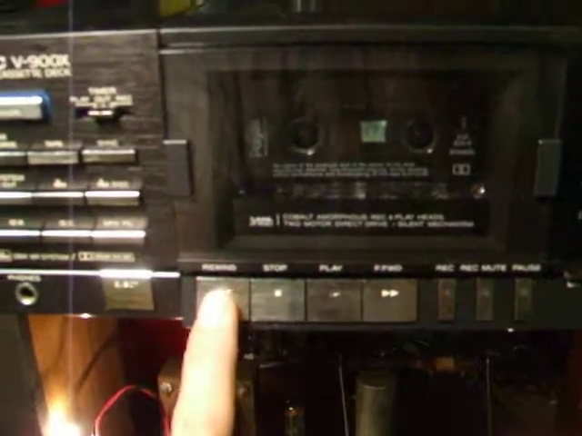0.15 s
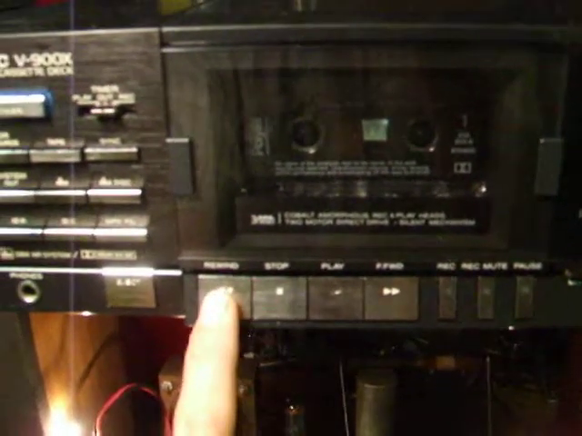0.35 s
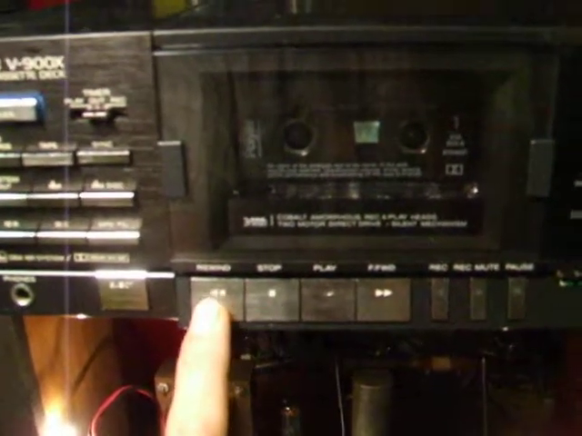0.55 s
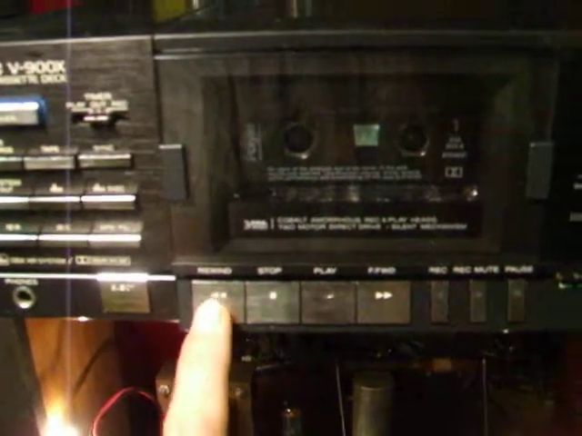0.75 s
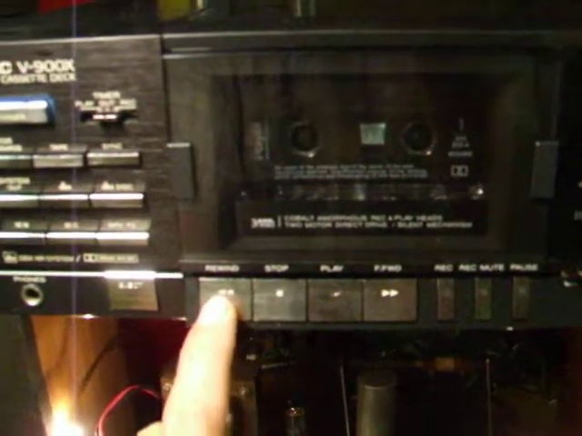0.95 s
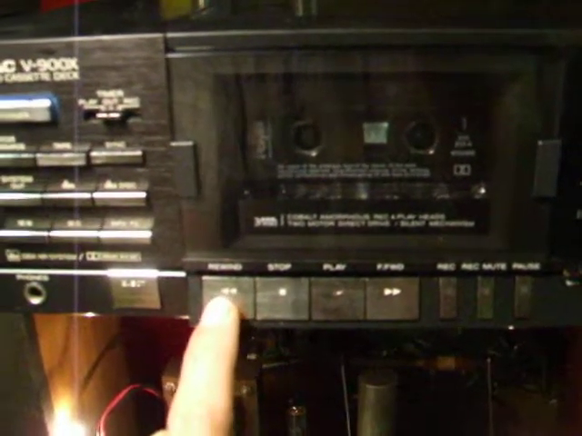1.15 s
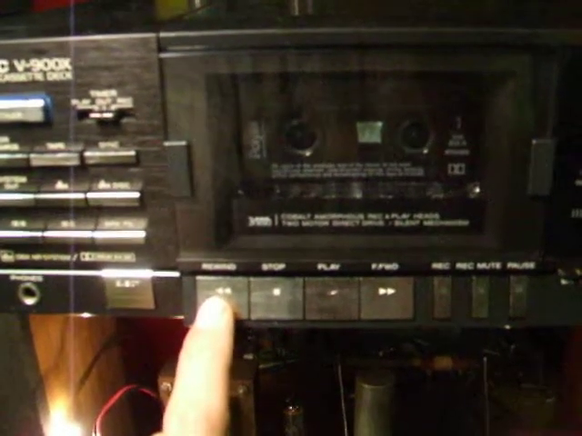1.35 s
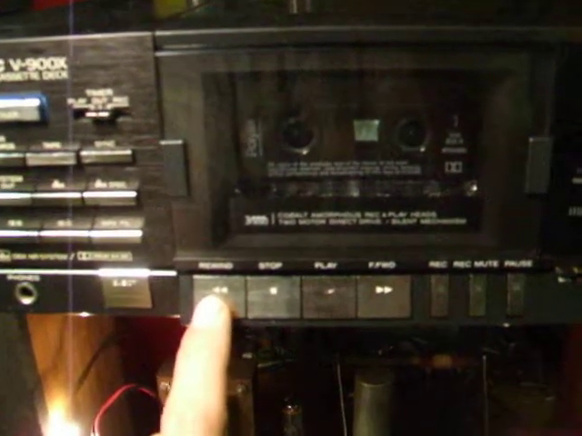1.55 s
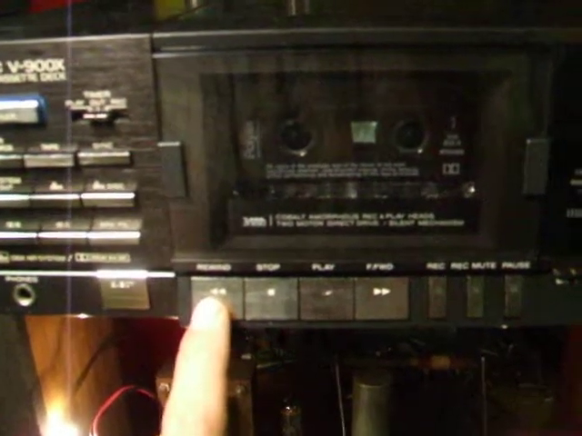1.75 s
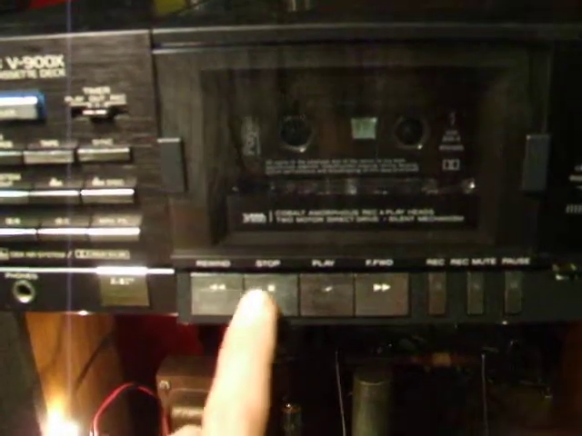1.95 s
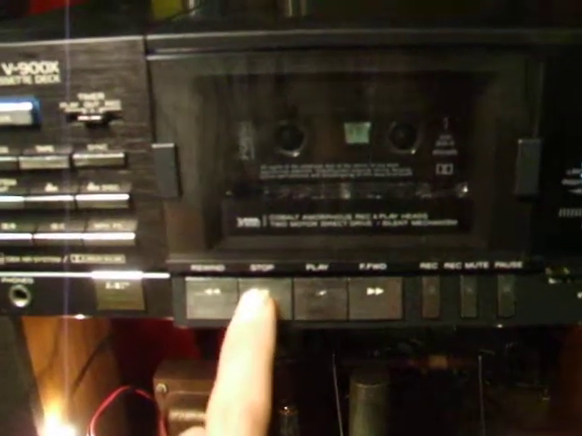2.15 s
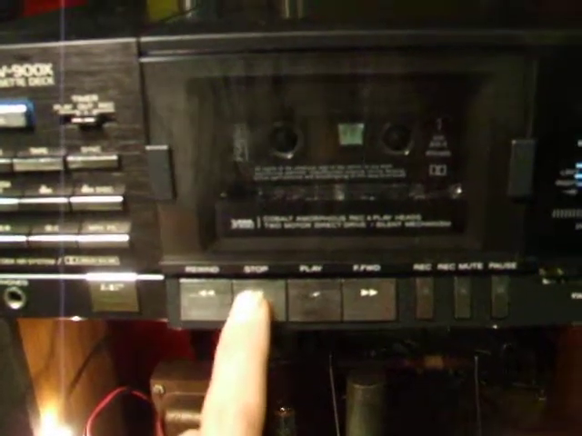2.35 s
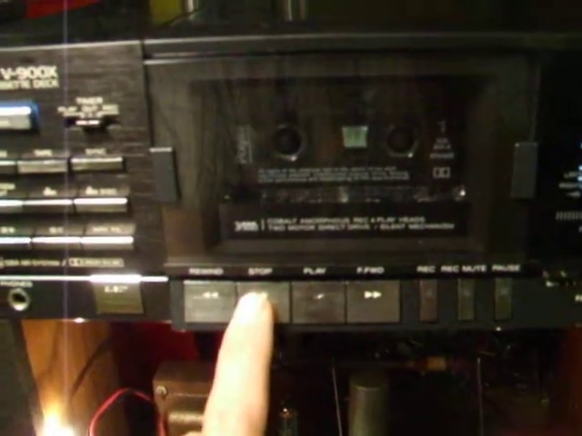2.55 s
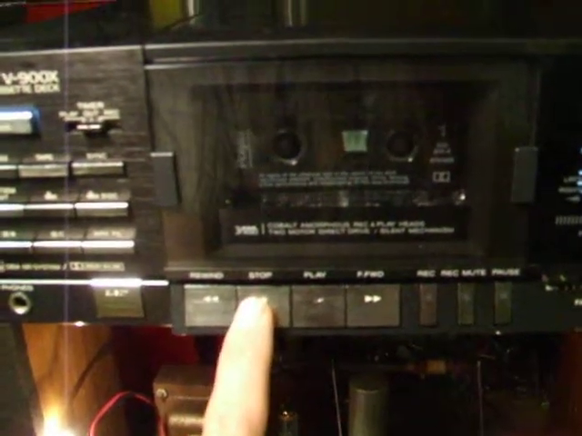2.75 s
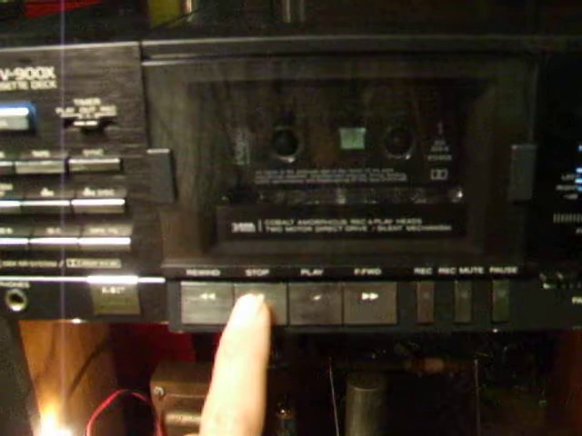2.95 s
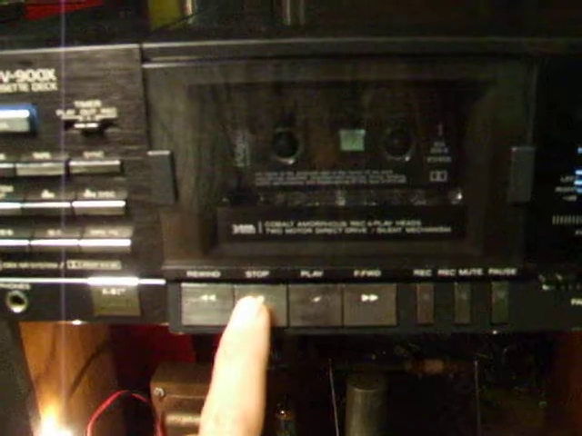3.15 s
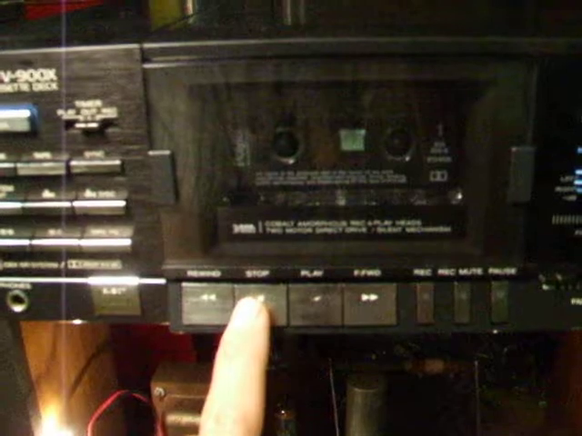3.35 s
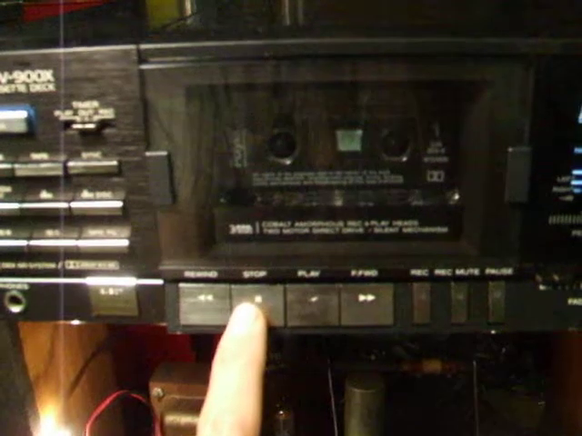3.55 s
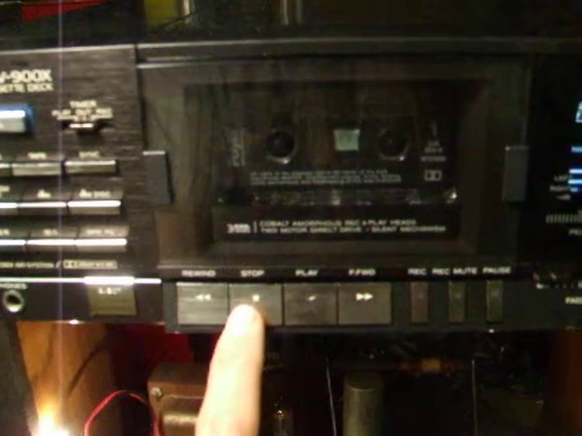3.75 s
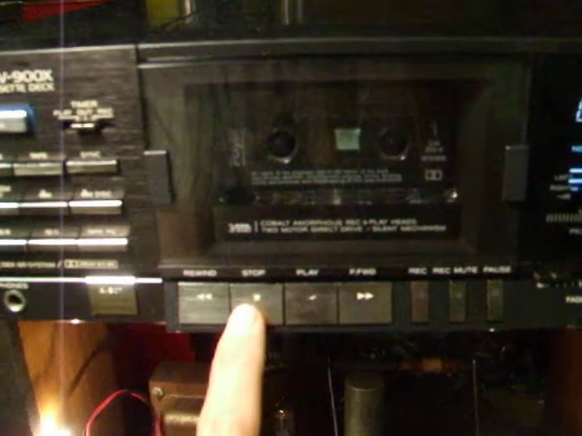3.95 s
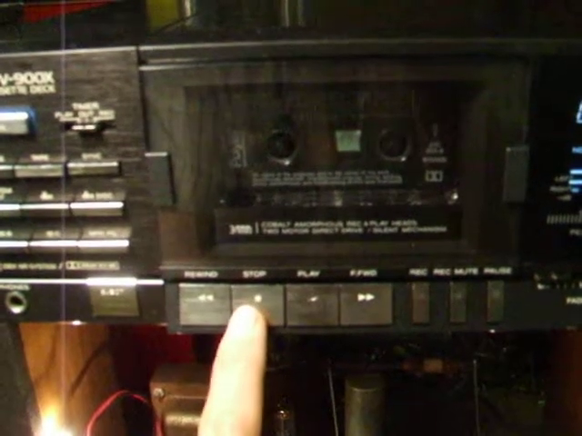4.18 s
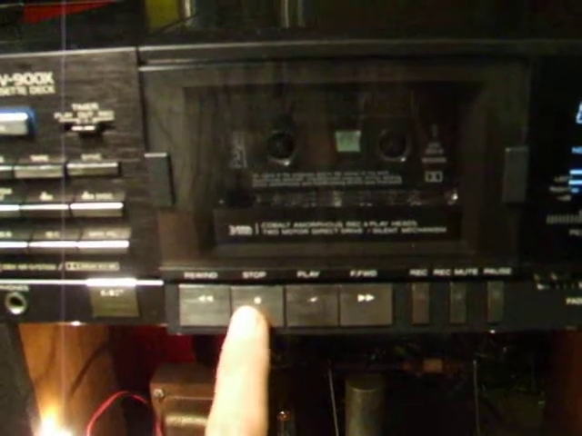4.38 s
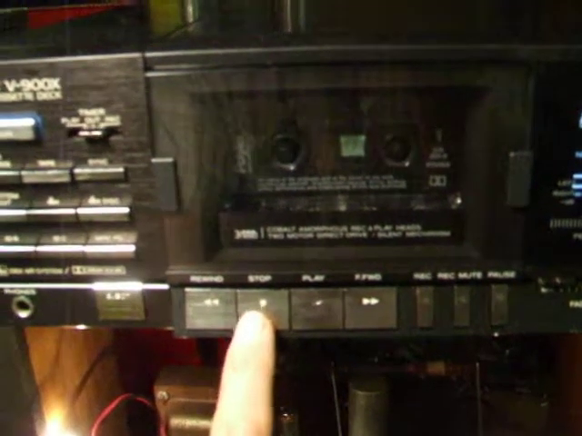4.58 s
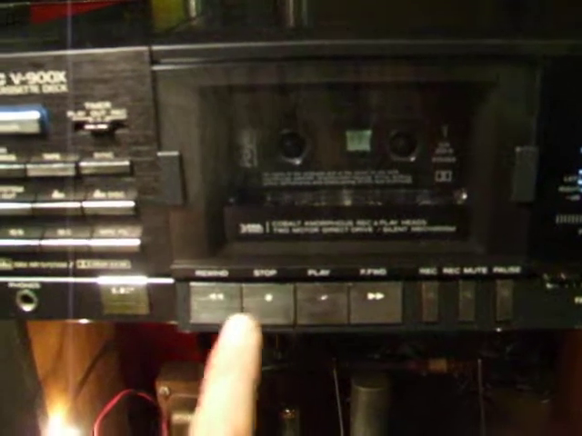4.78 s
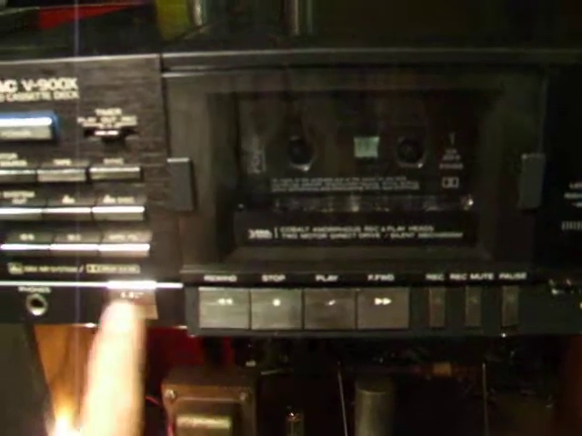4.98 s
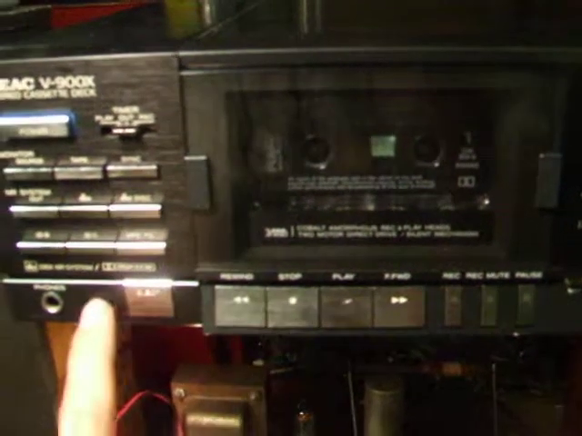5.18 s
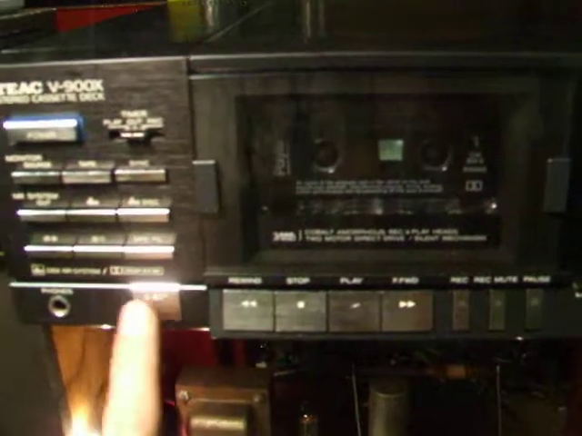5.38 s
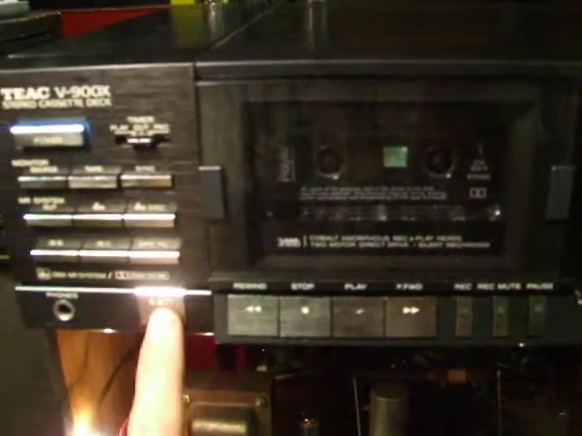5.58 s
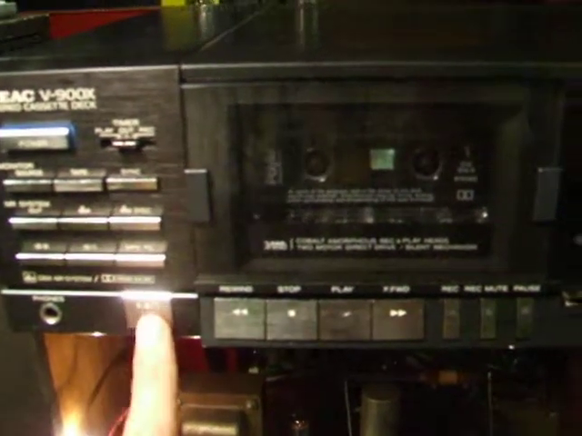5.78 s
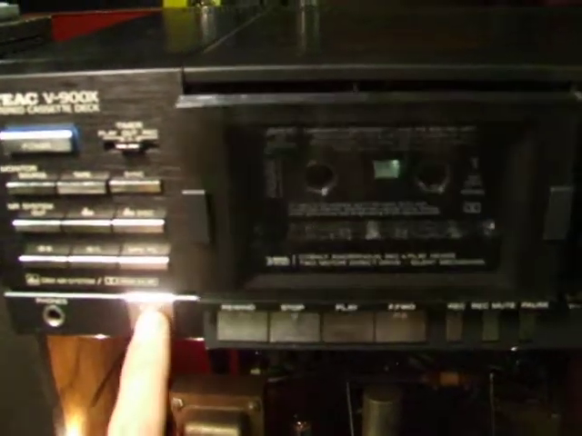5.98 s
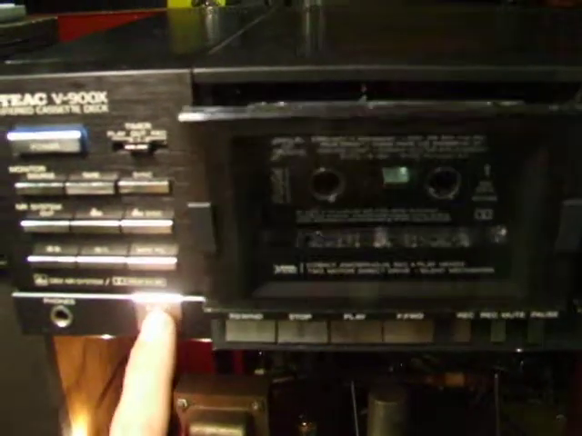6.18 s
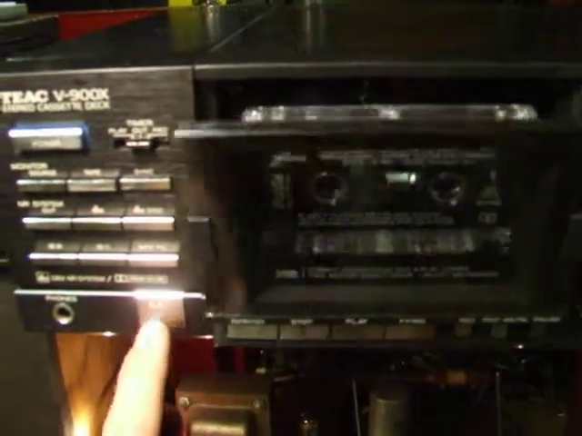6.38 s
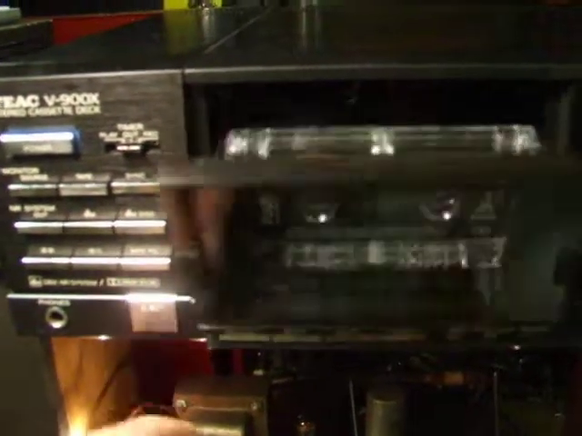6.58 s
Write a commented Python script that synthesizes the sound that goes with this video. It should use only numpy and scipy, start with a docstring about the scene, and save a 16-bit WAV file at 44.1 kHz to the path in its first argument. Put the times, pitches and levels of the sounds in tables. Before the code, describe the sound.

Close-up cassette deck winding, switching to rewind with sharp clacks, stopping with a thunk, then a loud eject latch and rattling plastic door.

```python
"""Cassette deck: wind, rewind, stop, eject

Close to a small camera, a tape winds forward, a button clicks, and the drive clacks over and rewinds.
Gear whine is a stack of sine waves tied to the turning shaft; the sliding tape is coloured noise.
Stop is pressed and the brakes bite; then eject trips the latch and the door swings open.
Keys ring as fading sine waves, and blows on the deck and door are short bursts of coloured noise.
Mains hum, hiss and a thin electronic whistle lie under it all."""
import sys
import numpy as np
from scipy import signal
from scipy.fft import rfft, irfft, next_fast_len
from scipy.io import wavfile
from scipy.ndimage import uniform_filter1d, map_coordinates

SR = 44100
rng = np.random.default_rng(int(sys.argv[2]) if len(sys.argv) > 2 else 0)


def wrap_up_sound(samples):
    """Save the sound to the file named by the first command line argument, as 16-bit audio."""
    columns = np.atleast_2d(samples).T
    # keep every value between -1 and 1, then stretch to whole-number steps
    tamed = np.clip(columns, -1, 1)
    steps = np.round(tamed * 32767).astype(np.int16)
    wavfile.write(sys.argv[1], SR, steps)


N = 292383


def amp(db):
    """Decibels to gain."""
    return 10 ** (np.asarray(db) / 20)


def unit(x):
    """Scaled to an rms of 1."""
    return x / np.sqrt(np.mean(x ** 2) + 1e-20)


def along(points, hz):
    """Joins (f/Hz, value) points with straight lines on a log frequency axis."""
    f, value = np.transpose(points)
    return np.interp(np.log(hz + 1), np.log(f + 1), value)


def peaks(resonances, hz):
    """The lift (or dip, if negative) in dB of (f/Hz, width/Hz, level/dB) resonances."""
    return sum(db / (1 + (2 * (hz - centre) / width) ** 2) for centre, width, db in resonances)


def clock():
    """The time of every sample in seconds."""
    return np.arange(N) / SR


def wobble(rate):
    """A smooth random curve through `rate` random points a second."""
    points = rng.standard_normal(int(N * rate / SR) + 4)
    return map_coordinates(points, [np.arange(N) * rate / SR])


def coloured(x, colour_db):
    """x through a gain given in dB as a function of frequency."""
    size = next_fast_len(len(x) + 8192)
    gain = amp(colour_db(np.fft.rfftfreq(size, 1 / SR)))
    return irfft(rfft(x, size) * gain, size)[:len(x)]


def noise(spectrum):
    """Noise of rms 1 with the given spectrum."""
    return unit(coloured(rng.standard_normal(N), lambda hz: along(spectrum, hz)))


def fade(t, t60):
    """Free decay, 60 dB down after t60 seconds."""
    return np.exp(-np.log(1000) * t / t60)


def gate(start, rise, stop, fall):
    """Ramps up over `rise` seconds from start and down over `fall` seconds from stop."""
    t = clock()
    opening = np.clip((t - start) / rise, 0, 1)
    closing = np.clip(1 - (t - stop) / fall, 0, 1)
    return opening * closing


def add(track, s, sound):
    """Mixes a sound into the track at s seconds."""
    part = track[round(s * SR):][:len(sound)]
    part += sound[:len(part)]


def tones(lines, shift):
    """Steady sine waves at random starting points, all shifted by `shift` cycles."""
    t = clock()
    return sum(np.sqrt(2) * amp(db) * np.sin(2 * np.pi * (hz * t + shift + rng.random()))
               for hz, db in lines)


# hum of the mains and the idling deck: (f/Hz, rms level/dB)
HUM = [(59.97, -48), (120, -74), (300, -74), (360, -68.5), (409.5, -64.5)]
# the camera's electronic whistle: (f/Hz, rms level/dB)
WHISTLE = [(7867, -62.5), (8133, -65.5)]
# shape of the hiss: (f/Hz, relative level/dB)
HISS = [(53, -47), (90, -9), (305, -5), (329, -5), (404, -7), (436, -8.5), (1070, -9.5), (1400, -11),
        (6760, -14.5), (8000, -15), (10400, -38), (17600, -120)]


def background():
    """Steady hum, hiss, and the camera's whistle, whose phase flips with every picture frame."""
    # half a cycle more 30 times a second, each step slightly smoothed
    flips = uniform_filter1d(np.floor(30 * clock()) / 2, size=200)
    return tones(HUM, 0) + tones(WHISTLE, flips) + amp(-53.5) * noise(HISS)


# the motor winds forward, sags as the gear swings over, pulls up in reverse and is braked;
# speed before smoothing and reel drag: (t/s, turns per second)
MOTOR = [(0, 35.6), (.845, 35.75), (.865, 19.5), (.96, 29.8), (1.07, 30.5), (1.2, 32), (1.7, 32.35),
         (4.52, 32.5), (4.6, 15)]
# the rewinding reel rubs once a revolution: time of its first rub, time of one revolution
FIRST_RUB_S, REEL_TURN_S = 1.375, .2016
# typical share of the speed lost in a rub, narrowness of the rub, its spread from turn to turn
DRAG_SHARE, DRAG_NARROW, DRAG_SPREAD = .042, 1.4, 0.1195


def shaft_speed():
    """Turns per second: the motor's speed, pulled down at every revolution of the rewinding reel."""
    t = clock()
    free = uniform_filter1d(np.interp(t, *np.transpose(MOTOR)), size=700)
    reel_turns = (t - FIRST_RUB_S) / REEL_TURN_S
    rub = (np.cos(np.pi * reel_turns) ** 2) ** DRAG_NARROW * (reel_turns > -.5)
    return free * (1 - DRAG_SHARE * rub * (1 + DRAG_SPREAD * wobble(5)))


# the chassis favours some pitches, so the whine's partials come and go with the speed:
# (f/Hz, width/Hz, level/dB)
CHASSIS = [(325, 32, 6.5), (585, 60, 7), (760, 43, 4.5), (800, 60, -4.5), (1070, 74, 2.5), (2336, 54, 6),
           (2370, 70, -2)]


def gear(orders, turns, rough, sweep):
    """Meshing teeth: sine waves locked to the shaft, trembling as the teeth seat differently.
    The wheel is off centre: at sweep 0 the whine swells once a turn, towards pi / 2 its pitch swings."""
    trembles = [wobble(70) for _ in range(5)]
    mesh = np.zeros(N)
    for i, (multiple, db) in enumerate(orders):
        k = np.round(multiple)
        level = np.sqrt(2) * amp(db) * (1 + rough * trembles[i % len(trembles)])
        mesh += level * np.sin(2 * np.pi * k * turns + sweep * k ** 2)
    return coloured(mesh, lambda hz: peaks(CHASSIS, hz))


# resonances of the cassette shell: (f/Hz, width/Hz, level/dB)
SHELL = [(3170, 62, 2.5), (4450, 240, 4), (5330, 140, 3.5), (5630, 330, 7), (5910, 180, 7),
         (6610, 120, 4.5), (7500, 430, 3)]


def tape(spectrum, turns, repeat_db, throb_db, grain_db):
    """Sliding tape and worn teeth: a grainy rush that swells and partly repeats with every turn."""
    wear = rng.standard_normal(size=900)  # the roughness met during one turn
    scrape = map_coordinates(wear, [turns % 1 * len(wear)], mode="grid-wrap")
    rush = rng.standard_normal(N) + amp(repeat_db) * scrape
    rush = rush * amp(throb_db * np.cos(2 * np.pi * turns) + grain_db * wobble(400))
    return unit(coloured(rush, lambda hz: along(spectrum, hz) + peaks(SHELL, hz)))


# the 25-tooth gear and its once-a-turn sidebands, in each direction, before drive() trims them:
# (multiple of the shaft rate, rms level/dB)
FORWARD_GEAR = [(25, -63), (28, -65), (50, -61), (52, -64), (53, -68), (73, -66), (75, -54), (76, -57),
                (77, -66), (91, -65), (97, -66), (99, -63), (100, -61), (123, -67), (124, -63), (126, -67),
                (150, -67), (151, -65), (168, -68), (169, -67)]
REWIND_GEAR = [(13, -70), (23, -68), (24, -63), (25, -62), (26, -72), (29, -70), (33, -68), (34, -71),
               (39, -72), (45, -70), (46, -68), (47, -60), (48, -63), (49, -52), (50, -50), (51, -55),
               (53, -68), (54, -68), (73, -67), (74, -62), (75, -65), (76, -67), (79, -69), (100, -70),
               (140, -71)]
# the motor's growl while it pulls the reels up to speed: (multiple of the shaft rate, rms level/dB)
STRAIN = [(11, -58.5), (24, -67), (25, -54.5)]
# shape of the rush of tape sliding through the shell: (f/Hz, relative level/dB)
FORWARD_TAPE = [(100, -42), (300, -7.5), (600, -3.5), (1100, 1), (2200, -1), (3300, 2), (4400, -1.5),
                (5000, -4.5), (6000, -6.5), (7300, -1), (8200, -9)]
REWIND_TAPE = [(100, -32.5), (300, -9), (600, -4.5), (1050, 0.5), (1900, -2.5), (2400, 5), (2800, -3),
               (3200, 2), (4400, 0.5), (5100, -2.5), (5800, -3.5), (7000, -1.5), (8200, -6.5)]


def drive():
    """The motor winds forward, sags while the gear swings over, and strains up to speed in reverse."""
    turns = np.cumsum(shaft_speed() * (1 + 0.00199 * wobble(45))) / SR
    forward_whine = amp(1.0) * gear(FORWARD_GEAR, turns, rough=.27, sweep=.7)
    forward_rush = amp(-47.0) * tape(FORWARD_TAPE, turns, repeat_db=-4, throb_db=1.5, grain_db=3.0)
    forward = (forward_whine + forward_rush) * gate(-1, .5, 0.832, 0.018)

    seated = gate(0.872, 0.16, 4.51, 0.9)  # the teeth bite gradually
    rewind_whine = amp(0.36) * seated * gear(REWIND_GEAR, turns, rough=.27, sweep=1.0)
    rewind_rush = amp(-48.5) * tape(REWIND_TAPE, turns, repeat_db=-1.5, throb_db=2.0, grain_db=1.0)
    rewind = (rewind_whine + rewind_rush) * gate(0.7, 0.41, 4.51, 0.056)

    strain = gear(STRAIN, turns, rough=0.29, sweep=1.2) * gate(0.88, 0.1, 0.97, 0.11)
    return forward + rewind + strain


def snap(modes, pitch, crack_db, crack_t60):
    """A switch snaps through: a brief crack of noise and the ring of its plastic key."""
    t = np.arange(SR // 5) / SR
    ring = np.zeros(len(t))
    for hz, db, t60 in modes:
        level = amp(db + rng.normal(0, 1))
        ring += level * fade(t, t60) * np.sin(2 * np.pi * (hz * pitch * t + rng.random()))
    crack = amp(crack_db) * fade(t, crack_t60) * rng.standard_normal(len(t))
    return (ring + crack) * (1 - np.exp(-t / 0.00024))


def clack(colour, resonances, t60, tilt):
    """One blow on a body whose crowded modes die quickly; a hard blow is brighter (tilt, dB/octave)."""
    t = np.arange(SR // 4) / SR

    def colour_db(hz):
        return along(colour, hz) + peaks(resonances, hz) + tilt * np.log2(np.maximum(hz, 1500))

    ring = coloured(rng.standard_normal(len(t)), colour_db)
    return unit(ring) * fade(t, t60) * (1 - np.exp(-t / 0.00006))


# rewind and stop switches: (t/s, gain level/dB, pitch factor, crack level/dB before that gain)
BUTTONS = [(0.652, -18.5, 1.0, -6), (4.3444, -14.5, 1.01, -17)]
# what they ring with, before pitch factor and gain: (f/Hz, level/dB, t60/s)
BUTTON_MODES = [(357, -29, 0.17), (706, -34, 0.075), (1580, -22.5, 0.065), (1947, -13.5, 0.062),
                (2180, -10.5, 0.037), (2670, 8.5, 0.0059), (2980, -36, 0.06), (2716, -7.5, 0.036),
                (4900, -8, 0.0047), (6960, -19.5, 0.0085)]
# the steel transport: broad colour (f/Hz, relative level/dB), resonances (f/Hz, width/Hz, level/dB)
TRANSPORT_COLOUR = [(60, -27), (180, -21), (320, -6.5), (520, -4.5), (1200, -0.5), (2200, 3), (3800, -3),
                    (5000, 1), (6200, 1.5), (8200, -6.5)]
TRANSPORT_PEAKS = [(370, 53, 10.5), (740, 44, 1.4), (1080, 170, 3.3), (1980, 170, 4.7), (3800, 560, 4.8),
                   (5950, 710, 2.7), (7200, 1000, 10)]


def buttons():
    """Rewind and stop keys: each snap also shakes the deck behind it."""
    out = np.zeros(N)
    for s, db, pitch, crack_db in BUTTONS:
        add(out, s, amp(db) * snap(BUTTON_MODES, pitch, crack_db, crack_t60=0.03))
        add(out, s, amp(db - 21.0) * clack(TRANSPORT_COLOUR, TRANSPORT_PEAKS, t60=0.074, tilt=-2.8))
    return out


# a soft, dull blow sets more of the body ringing: growth of t60 for each dB per octave of dullness
DULL_RINGS_LONGER = 0.052


def knocks(blows, colour, resonances, t60):
    """Single blows on one body; t60 is for a blow of tilt 0, and duller blows ring longer."""
    out = np.zeros(N)
    for s, db, tilt in blows:
        blow_t60 = t60 * np.exp(-DULL_RINGS_LONGER * tilt)
        add(out, s, amp(db) * clack(colour, resonances, blow_t60, tilt))
    return out


# levers and brakes striking the transport: (t/s, level/dB, brightness in dB per octave above 1500 Hz)
TRANSPORT_BLOWS = [(0.8752, -28, 2.5), (0.9290, -28.5, 3.5), (0.9770, -34, 0), (4.5060, -37.5, -6.5),
                   (4.520, -36.5, -5), (4.5355, -25.5, -2.5), (4.5600, -33.5, -8.5), (4.5670, -40, 6),
                   (4.9480, -43, -3.5)]


def transport():
    """Levers and brakes strike the steel transport as it changes gear and stops."""
    return knocks(TRANSPORT_BLOWS, TRANSPORT_COLOUR, TRANSPORT_PEAKS, t60=0.078)


# low bumps of the hand and the door on the case: (t/s, level/dB, f/Hz)
BUMPS = [(4.865, -53, 154), (5.351, -44.5, 177), (5.66, -52, 125), (5.82, -45.5, 169), (5.922, -28, 324),
         (6.268, -40, 197)]


def bumps():
    """Each bump wakes one low mode of the case, a quickly fading sine wave."""
    out, t = np.zeros(N), np.arange(SR // 4) / SR
    for s, db, hz in BUMPS:
        ring = np.sin(2 * np.pi * hz * t) * fade(t, 0.12)
        add(out, s, amp(db) * ring * (1 - np.exp(-t / 0.005)))
    return out


# fingers and door rubbing on plastic: (t/s, level/dB, width/s, centre f/Hz)
RUBS = [(5.4, -54.5, 0.043, 1000), (5.88, -47, 0.025, 1670), (6.16, -47, 0.043, 1460),
        (6.397, -45, 0.0072, 4300), (6.44, -43, 0.015, 3900)]


def rubs():
    """Fingers and door slide in short, grainy strokes of noise."""
    out = np.zeros(N)
    for s, db, width, hz in RUBS:
        scrape = noise([(hz / 5, -16), (hz, 0), (hz * 3, -18)])
        grains = unit(scrape * amp(2.7 * wobble(250)))
        out += amp(db) * grains * np.exp(-.5 * ((clock() - s) / width) ** 2)
    return out


# what the eject key rings with, before its gain: (f/Hz, level/dB, t60/s)
EJECT_MODES = [(347, -31, 0.12), (960, -19, 0.071), (1054, -29, 0.054), (1990, -19, 0.071),
               (2630, -5, .015), (2930, -9.5, 0.024), (3537, 0, 0.02), (3950, -8, 0.033),
               (4550, -4.5, 0.016), (4960, -3.5, 0.013), (7200, -12, .012)]
# the plastic door: broad colour (f/Hz, relative level/dB), resonances (f/Hz, width/Hz, level/dB)
DOOR_COLOUR = [(60, -29), (150, -9), (300, -0.5), (520, -6), (1200, 2.5), (1750, 2), (2800, -1), (4200, -2),
               (5200, -1), (6200, -2), (8200, -7.5)]
DOOR_PEAKS = [(240, 26, 2.6), (363, 50, 10.7), (687, 48, 14), (1023, 50, 12), (1227, 117, 12.7),
              (1484, 70, 6.9), (2020, 170, 7.6), (4080, 430, 5), (4950, 580, 2.5), (6280, 170, 7),
              (7140, 650, 8.5)]


def eject_key():
    """The smaller, brighter eject key snaps and shakes the door behind it."""
    out, s = np.zeros(N), 5.7215
    add(out, s, amp(-20.0) * snap(EJECT_MODES, 1, crack_db=-11.5, crack_t60=0.018))
    add(out, s, amp(-39) * clack(DOOR_COLOUR, DOOR_PEAKS, t60=0.11, tilt=-.6))
    return out


# the eject linkage and the door knocking on their guides:
# (t/s, level/dB, brightness in dB per octave above 1500 Hz)
DOOR_BLOWS = [(5.8750, -36.5, -3), (5.8915, -29, -8), (5.9115, -24.5, 1.5), (5.9980, -42.5, -1),
              (6.1188, -37, -4), (6.1540, -23.5, 4.5), (6.248, -45.5, -8), (6.3865, -41, 2)]


def door():
    """The eject linkage and the swinging plastic door knock on their guides."""
    return knocks(DOOR_BLOWS, DOOR_COLOUR, DOOR_PEAKS, t60=0.079)


# the latch lets go and the sprung door chatters against it
LATCH_S, LATCH_DB = 5.9155, -10
# first flight, each flight over the one before, loss per rebound
REBOUND_S, REBOUND_SHRINK, REBOUND_LOSS_DB = .0145, 0.66, 3.5


def latch(count=6):
    """The door snaps free and rebounds ever faster and weaker; each contact cracks and rings the door."""
    out, s = np.zeros(N), LATCH_S
    for k in range(count):
        crack = clack(DOOR_COLOUR, DOOR_PEAKS, t60=0.022, tilt=.8)
        ring = clack(DOOR_COLOUR, DOOR_PEAKS, t60=0.087, tilt=1.2)
        contact = amp(-2.2 * k) * crack + amp(-10.0) * ring  # the crack weakens faster
        add(out, s, amp(LATCH_DB - REBOUND_LOSS_DB * k) * contact)
        s += REBOUND_S * REBOUND_SHRINK ** k
    return out


# the cassette rattles loosely while the door swings: start, length, level before random strength
SWING_S, SWING_LENGTH_S, RATTLE_DB = 6.05, 0.15, -44.5


def rattle(count=6):
    """Faint, dull knocks of the cassette in the swinging door, at uneven times."""
    out = np.zeros(N)
    for k, (late, strength) in enumerate(rng.random((count, 2))):
        s = SWING_S + SWING_LENGTH_S * (k + late) / count
        knock = clack(DOOR_COLOUR, DOOR_PEAKS, t60=.045, tilt=-6.5)
        add(out, s, amp(RATTLE_DB) * (.5 + strength) * knock)
    return out


def radiated(x, corner_hz):
    """Small panels and keys give off little bass."""
    return signal.sosfilt(signal.butter(2, corner_hz, "highpass", fs=SR, output="sos"), x)


# how long the room rings: (f/Hz, t60/s)
ROOM = [(200, 0.15), (1500, 0.17), (8000, 0.11)]


def room(x):
    """A small room's short tail of fading noise, 4 ms late; the treble dies first."""
    hz, t, z = signal.stft(rng.standard_normal(SR // 3), SR, nperseg=256)
    decay = fade(t, along(ROOM, hz)[:, None])
    tail = signal.istft(z * decay, SR, nperseg=256)[1]
    delayed = np.pad(tail, (round(.004 * SR), 0))
    return signal.fftconvolve(x, delayed / np.linalg.norm(tail))[:N]


def scene():
    """The deck in its room; only the keys and blows are given a room tail."""
    keys = buttons() + eject_key()
    blows = transport() + door() + latch() + rattle()
    tail = room(amp(-12) * keys + amp(-10.0) * blows)
    hits = radiated(keys + blows + tail, corner_hz=148)
    return (background() + drive() + hits + bumps() + rubs())[None]


# the camera microphone's response: (f/Hz, level/dB)
MICROPHONE = [(8150, 0.5), (8400, -9), (8800, -17), (9000, -34)]
TOP_HZ = 9130  # above this, a further 120 dB is taken off


def record(dry):
    """The camera's narrow band rolls off above 8 kHz; its converter sits slightly off zero."""
    heard = coloured(dry[0], lambda hz: along(MICROPHONE, hz) - 120 * (hz > TOP_HZ))
    return np.array([heard]) - .0024


dry = scene()
out = record(dry)
wrap_up_sound(out)
```